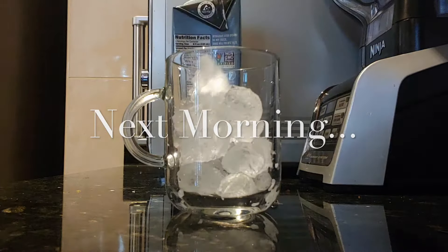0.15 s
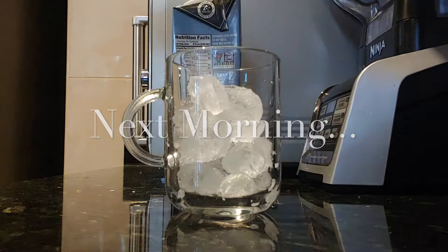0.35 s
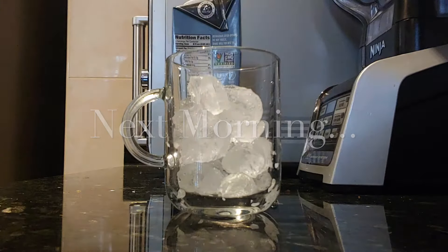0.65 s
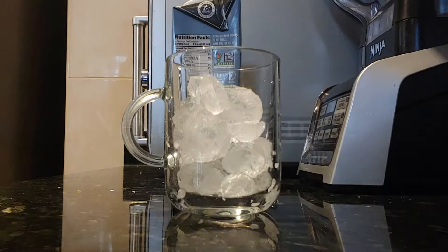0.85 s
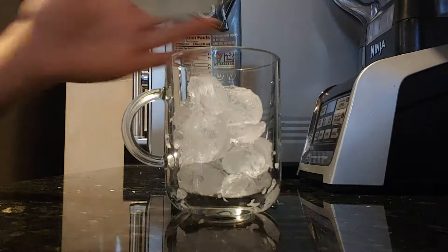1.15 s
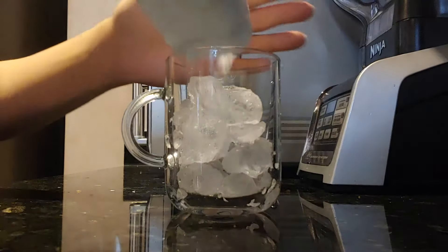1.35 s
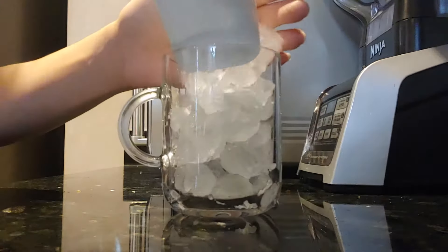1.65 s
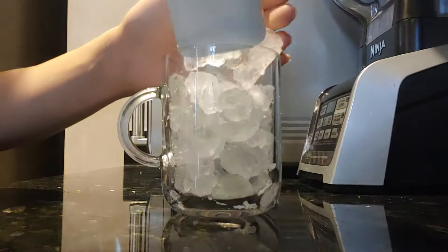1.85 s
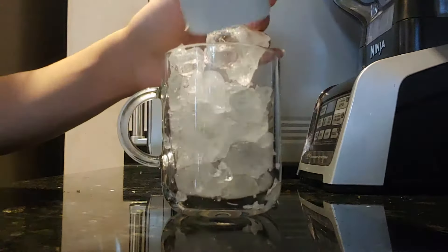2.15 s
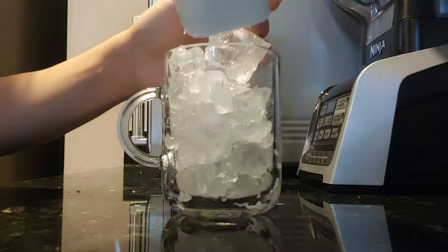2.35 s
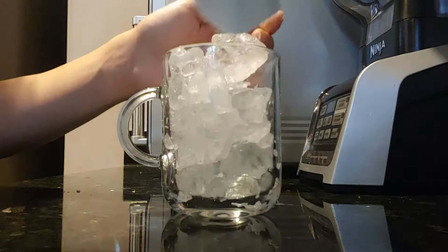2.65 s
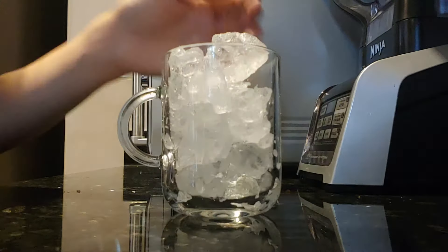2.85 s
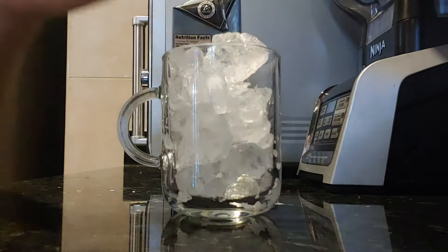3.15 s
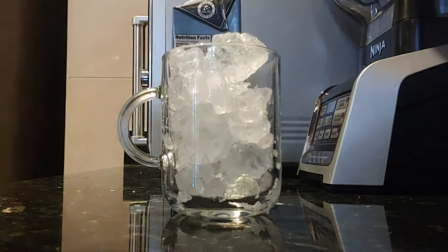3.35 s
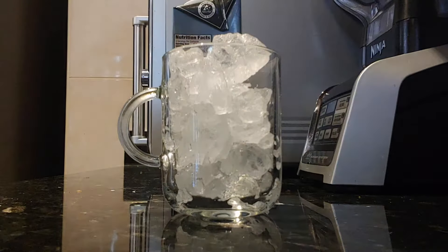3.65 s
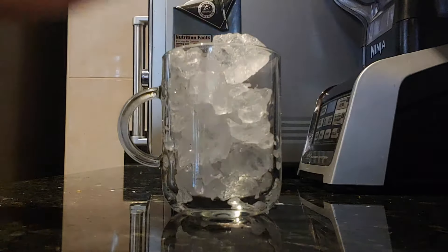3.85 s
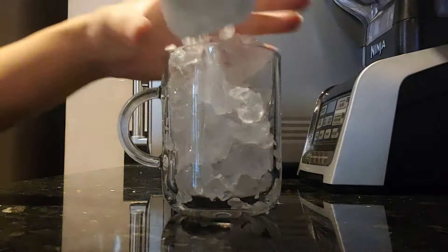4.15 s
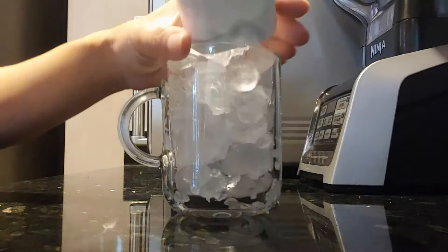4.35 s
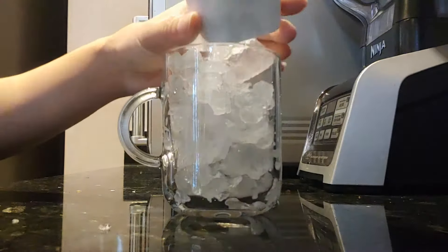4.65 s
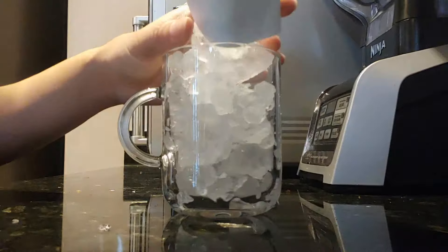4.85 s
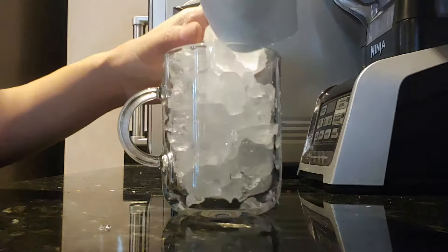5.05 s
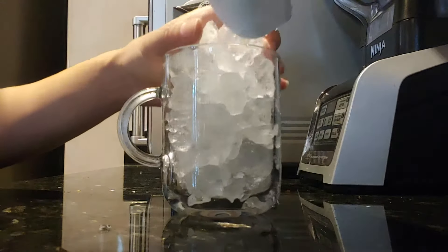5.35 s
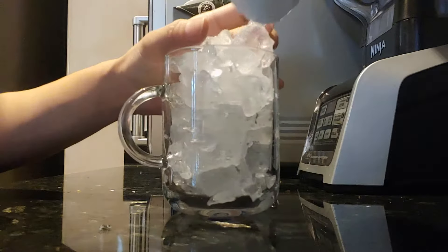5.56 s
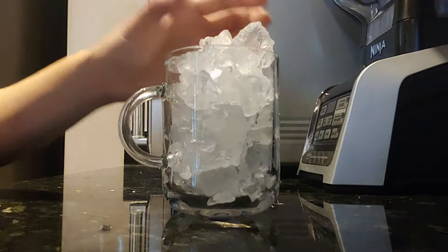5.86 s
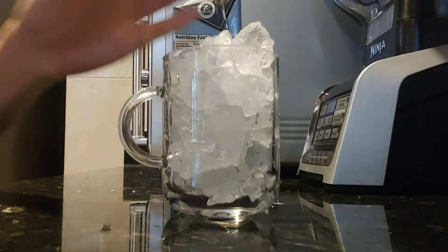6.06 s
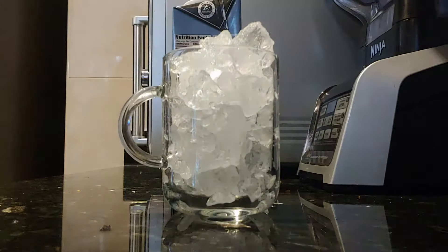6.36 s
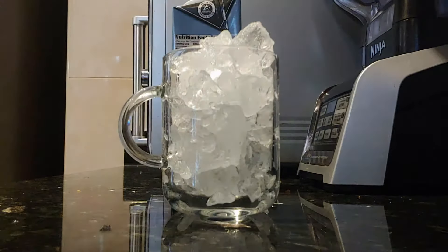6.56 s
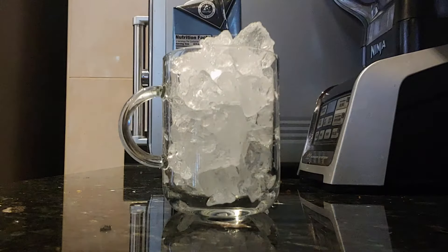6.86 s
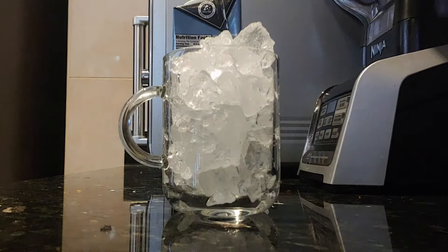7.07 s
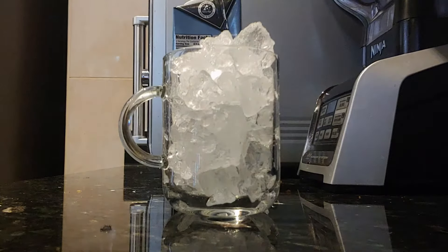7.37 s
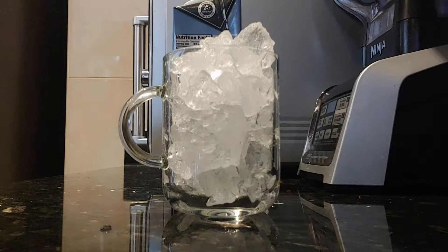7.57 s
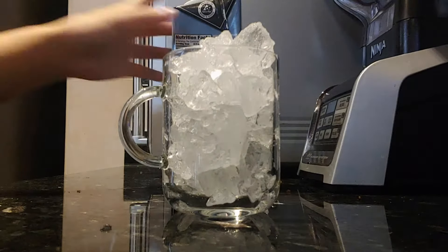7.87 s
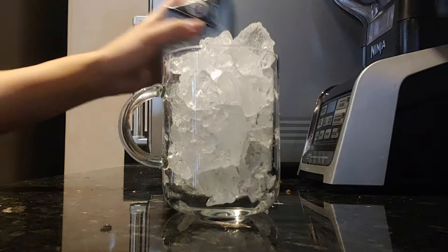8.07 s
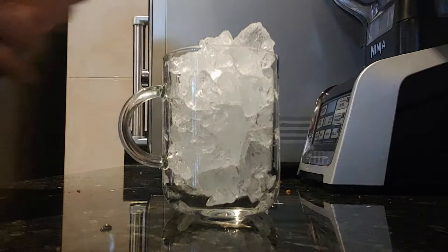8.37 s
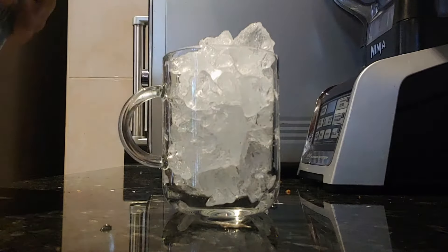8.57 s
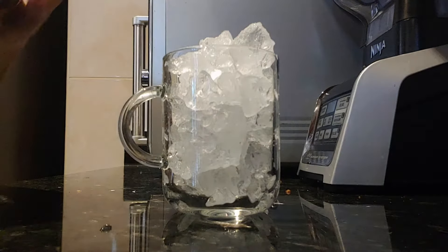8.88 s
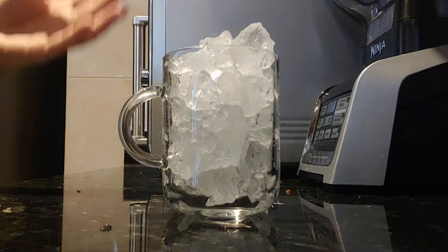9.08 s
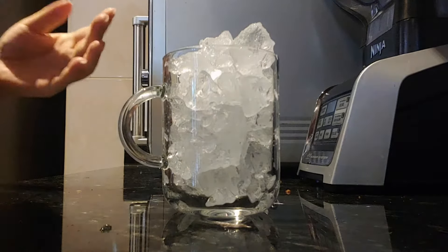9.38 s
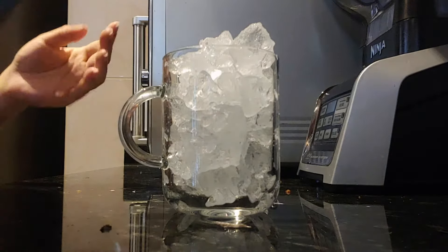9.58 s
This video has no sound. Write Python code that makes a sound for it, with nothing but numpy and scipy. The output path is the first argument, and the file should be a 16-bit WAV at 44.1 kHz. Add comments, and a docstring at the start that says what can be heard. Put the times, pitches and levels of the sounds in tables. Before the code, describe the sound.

A steady low fan rush with faint motor hum fills a small, hard kitchen throughout. At 0-0.4 s a cup hisses and drags through loose ice while a few cubes clink in a glass mug. A sharp distant clack comes at 0.6, then a flurry of hollow plastic knocks with counter thuds around 0.9. From 1.4 to 2.1 s ice pours in, bright, dense clinks over fine ticking, thinning to a strong single clink at 2.7. The plastic tub knocks at 3.0 and harder at 3.5. A second pour, 4.0-5.5 s, rattles lower and duller in the fuller mug. Two plastic knocks at 6.5 lead into crinkling film, snaps and rumble until about 7.2. Quiet taps follow; around 8.0-8.9 something is moved with soft bumps and light knocks. From 9.1 to the end, a bag of ice is shaken in loud, crunchy, rumbling jolts.

```python
"""A cup hisses and drags through loose ice while an appliance hums: shaped crackle over noise and motor tones.
Ice is tipped twice into a glass mug: damped modal clinks over finer ticks. Before, between and after,
a plastic tub is knocked (lower modes), with noise thuds through the stone counter and far clacks.
Small things are tapped; late on, a bag of ice is rummaged and shaken and a carton moved: crinkle, snaps, rumble.
Noise-built reflections and tail make the small, hard kitchen; two microphone ports colour the result."""
import sys
import numpy as np
from scipy import signal
from scipy.fft import rfft, irfft
from scipy.io import wavfile

SR = 44100
rng = np.random.default_rng(int(sys.argv[2]) if len(sys.argv) > 2 else 0)


def wav_out(sig):
    """Save sig, one row per channel (or a flat mono array), as 16-bit PCM at SR to the path in sys.argv[1]."""
    wavfile.write(sys.argv[1], SR, np.round(np.clip(np.atleast_2d(sig).T, -1, 1) * 32767).astype(np.int16))


N = 428652

# strokes of the cup through loose ice: (start [s], length [s], hiss [dB], drag [dB])
CUP_STROKES = [(0, 0.052, -35, -55), (0.13, 0.048, -41, -36.5), (0.24, 0.13, -39.5, -48.5),
               (0.41, 0.015, -29.5, -49)]
# loud cubes striking the mug: (time [s], level [dB], favoured ring [Hz], treble cue [dB])
MUG_CLINKS = [(0.001, -15, 2290, -15), (0.227, -11.5, 2120, -28), (0.299, -20.5, 2070, -3),
              (1.399, -1.5, 1570, 4.5), (1.461, -11.5, 2150, 0), (1.509, -8.5, 2090, -5),
              (1.587, -2.5, 1560, -15), (1.599, -2, 2050, 2), (1.612, -0.5, 2100, -1),
              (1.624, -4, 2090, -10), (1.648, -3.5, 1410, -19), (1.693, -6, 2160, -14),
              (1.715, -8.5, 1910, -1), (1.763, -18.5, 2010, -17), (1.938, -14.5, 2150, -4),
              (2.044, -5.5, 2140, -19), (2.247, -21, 1940, -15), (2.365, -21, 2200, -31),
              (2.596, -24.5, 1780, -23), (2.644, -27, 1010, -40), (2.728, 0.5, 1613, -18.5),
              (2.781, -16, 1580, -3), (4.007, -9.5, 2144, -10.5), (4.081, -18, 2184, -0.5),
              (4.206, -5.5, 2160, -5), (4.249, -4, 1600, -15), (4.266, -5.5, 1494, -26),
              (4.311, -9.5, 1490, -23), (4.339, -11.5, 1530, -14), (4.372, -12, 1514, -40),
              (4.462, -16, 1440, -42), (4.599, -15, 1395, -38), (4.654, -17, 1400, -42),
              (4.805, -7.5, 1620, -16), (4.885, -10, 1556, -20), (4.934, -11, 1570, -33),
              (4.955, -13, 1690, -23), (4.975, -8, 1445, -39), (5.144, -11.5, 1472, -25),
              (5.184, -17.5, 1530, -16), (5.251, -1.5, 1550, -22.5), (5.27, -10.5, 1640, -21),
              (5.358, -14.5, 1610, -15), (5.37, -13.5, 1470, -44), (5.528, -9, 2100, -20)]
# dull bumps carried by the counter: (time [s], level [dB])
COUNTER_THUDS = [(0.56, -40), (0.588, -41), (0.882, -26.5), (0.897, -24), (2.728, -31.5), (2.966, -37),
                 (3.483, -24.5), (3.52, -16.5), (6.819, -19.5), (7.028, -22.5), (8.354, -25),
                 (8.496, -27.5), (8.518, -26), (8.81, -34)]
# hard clacks across the kitchen: (time [s], level [dB])
FAR_CLACKS = [(0.614, -28), (0.641, -10), (3.355, -37.5)]
# blows on the plastic tub: (time [s], level [dB], favoured ring [Hz], treble cue [dB])
TUB_KNOCKS = [(0.871, -16, 1473, -11), (0.884, -14, 1460, -13), (0.917, -14.5, 1555, -15),
              (0.951, -13, 1520, -11), (0.964, -15, 1600, -41), (2.968, -9, 700, -41),
              (2.983, -9.5, 1740, -17), (2.996, -13, 1190, -9), (3.483, -2, 1485, -18),
              (3.498, -3, 1410, -13), (3.516, -6.5, 1630, -13), (3.523, -0.5, 1007, -11),
              (3.538, -13, 1520, 0), (6.472, -8.5, 1550, -17), (6.488, -2.5, 1430, -2),
              (8.034, -20, 993, -14)]
# batches of cubes sliding into the mug: (start [s], length [s], level [dB])
ICE_SLIDES = [(1.4, .37, -31.5), (1.54, 0.11, -27.5), (1.77, 0.12, -43.5), (1.96, .12, -35.5),
              (2.55, 0.054, -45.5), (2.755, 0.037, -36.5), (3.98, 0.048, -35), (4.04, .16, -42),
              (4.21, 0.069, -28.5), (4.29, 0.13, -35), (4.42, 0.29, -44), (4.83, 0.15, -35.5),
              (5.02, 0.34, -41.5), (5.5, 0.042, -40.5)]
# light taps of things being handled: (time [s], level [dB], favoured ring [Hz], treble cue [dB])
LIGHT_TAPS = [(3.6228, -30, 6820, -4), (3.7742, -35.5, 6940, -6), (6.4028, -31.5, 1480, 6),
              (7.5054, -28.5, 1800, -6), (7.5936, -33, 2330, -12), (8.2707, -29.5, 6860, -5),
              (8.4931, -21, 2160, -24), (8.5525, -20, 2220, -29), (8.6036, -30, 2190, -6),
              (8.7146, -23, 2580, -6), (8.8738, -19.5, 2070, -15.5), (9.1142, -19, 7100, -1),
              (9.1232, -18, 7160, 0), (9.1354, -15, 6850, -18)]
# rustles of bag and carton being handled: (start [s], length [s], crinkle [dB], rumble [dB])
BAG_RUSTLES = [(6.52, 0.06, -26.5, -33), (6.7, 0.11, -25, -31), (6.87, .26, -29.5, -31.5),
               (7.2, 0.39, -47.5, -47), (8.01, 0.045, -37, -42.5), (8.15, 0.65, -49.5, -50.5),
               (8.37, .02, -40.5, -48), (8.51, 0.034, -43, -48), (8.78, 0.053, -41, -39.5),
               (9.14, 0.55, -35, -35.5), (9.39, 0.024, -34.5, -34.5)]
# jolts of the bag, its ice shifting: (time [s], level [dB], thump re level [dB], film snap re level [dB])
BAG_JOLTS = [(6.739, -18, -9, -1.5), (6.817, -27.5, -10, 9), (6.947, -29, -12, 10.5),
             (7.024, -15.5, -8.5, -8), (9.132, -5.5, -13, -6.5), (9.259, -8.5, -18.5, -37),
             (9.356, -5, -15.5, -39), (9.496, -5, -23, -40), (9.596, -6.5, -13, -35)]

# modes of the ice-filled mug: (nominal frequency [Hz], level [dB], t60 [s])
MUG_MODES = [(650, -2, 0.054), (870, -17, 0.024), (1240, 4, 0.024), (1410, -5.5, 0.043), (1523, -2, 0.042),
             (2100, 4, 0.024), (2209, 4, 0.018), (2640, -7.5, 0.028), (3420, 3, 0.013), (3960, -3, 0.026),
             (4164, -3.5, 0.027), (4966, -3, 0.051), (5160, -5.5, 0.03), (5850, -22, 0.024),
             (6880, -24, 0.089), (9300, 0, 0.041), (12200, -26, .02), (14200, -24, .01)]
# modes of the plastic tub: (nominal frequency [Hz], level [dB], t60 [s])
TUB_MODES = [(166.4, -1.5, 0.1), (276.7, -5, 0.13), (486, 2.5, 0.079), (728, 2.5, 0.034), (1008, 16, 0.032),
             (1400, -0.5, 0.064), (1490, 2.5, 0.062), (1860, -5, 0.019), (2280, -1, 0.044),
             (3140, -10, 0.022), (4200, -27, 0.024), (7150, -13.5, 0.1)]
# modes of small hard things: (nominal frequency [Hz], level [dB], t60 [s])
TRINKET_MODES = [(520, -7, 0.083), (1040, 14, 0.014), (2210, 4, 0.012), (2710, -1, 0.023), (3140, 2, 0.019),
                 (4430, -10, 0.04), (7220, -16, 0.019)]

# contact noise of a blow: (frequency [Hz], level [dB])
CRACK_SPECTRUM = [(100, 1), (400, 0.5), (900, 13), (1600, 14.5), (3500, 1), (7000, -2), (15000, 4)]
# ice hissing along the cup: (frequency [Hz], level [dB])
SCRAPE_SPECTRUM = [(150, -25), (900, -18), (2200, -2), (4000, -6), (7000, -2), (11000, 2.5), (15000, 3)]
# drone of the cup pushed into ice: (frequency [Hz], level [dB])
DRAG_SPECTRUM = [(300, -34), (950, 3), (1300, -1), (2200, 2.5), (4000, -5.5), (8000, -11.5)]
# thuds and bag rumble: (frequency [Hz], level [dB])
RUMBLE_SPECTRUM = [(40, -11), (100, -3.5), (170, -1.5), (235, -6.5), (300, 1.5), (380, 0), (520, -5),
                   (800, -10.5), (1500, -15), (5000, -66)]
# far clacks: (frequency [Hz], level [dB])
CLACK_SPECTRUM = [(150, -33), (600, -12), (1300, 0), (2000, 2), (3200, 3.5), (5500, 1), (6500, 8.5),
                  (7400, 4), (10000, 5.5), (11500, 7.5), (15000, 11)]
# crinkling film: (frequency [Hz], level [dB])
CRINKLE_SPECTRUM = [(200, -31), (600, 4), (1000, 4), (1900, 2.5), (3000, -3), (5000, -6), (7000, -7.5),
                    (11000, -4.5), (15000, -2)]
# snapping film: (frequency [Hz], level [dB])
FILM_SPECTRUM = [(1500, -21), (4000, -8), (7000, 0), (11500, 4), (15000, -9)]
# fan rush: (frequency [Hz], level [dB])
AIR_SPECTRUM = [(25, 6), (55, -7), (90, 1), (170, -4), (260, -8.5), (400, -8), (550, -14), (800, -22.5),
                (1000, -22.5), (1300, -32), (2200, -34.5), (4000, -37), (7000, -35.5), (15000, -31.5)]
# motor tones: (frequency [Hz], rms level [dB])
MOTOR_TONES = [(53.8, -54.5), (178, -61), (361, -65.5), (425, -64.5)]
# decay of the room's tail by band: (from [Hz], to [Hz], t60 [s])
ROOM_BANDS = [(101, 1700, 0.089), (477, 2000, 0.17), (2160, 20800, 0.41), (8600, 16000, 0.083)]
# resonances of the left microphone port: (frequency [Hz], gain [dB])
LEFT_PORT_GAIN = [(100, 2.5), (700, 5), (1400, -0.5), (2000, -4.5), (2700, 2), (3800, 6), (5200, 7),
                  (7200, -2.5), (8500, -18.5), (9800, -5.5), (10600, -10.5), (11800, -2), (13000, -17.5),
                  (14300, -16.5)]
# resonances of the right microphone port: (frequency [Hz], gain [dB])
RIGHT_PORT_GAIN = [(100, 0.5), (700, 4), (1200, 1), (1600, 6), (2100, 10), (3000, 8), (4000, 7.5),
                   (5900, 0), (6950, 13.5), (7700, 4.5), (8500, -15.5), (11000, -17.5), (15000, -23)]

# builds rise by 60 dB, t60s fall by 60 dB
STROKE_BUILD_S, STROKE_T60_S = 0.24, 0.25
SLIDE_BUILD_S, SLIDE_T60_S = 0.18, 0.13
RUSTLE_BUILD_S, RUSTLE_T60_S = 0.2, 0.4
JOLT_ATTACK_S, JOLT_T60_S = 0.021, 0.16
CLINK_PAN_DB, CLINK_SCATTER_DB = 0.8, 2  # left minus right; cubes land round the wall
AIR_RMS_DB = -48
TOP_HZ = 15900
TIME_S = np.arange(N) / SR
RING_TIME_S = TIME_S[:SR // 8]
ROOM_TIME_S = TIME_S[:SR // 2]


def undb(db):
    """Decibels to gain."""
    return 10 ** (np.asarray(db) / 20)


def unit(x):
    """Scale to rms 1."""
    return x / np.sqrt(np.mean(x ** 2))


def fade(t_s, t60_s):
    """Free decay, 60 dB down after t60."""
    return np.exp(-np.log(1000) * t_s / max(t60_s, 1e-3))


def convolve(x, response):
    """Pass sound through a response, keeping its length."""
    return signal.fftconvolve(np.atleast_2d(x), np.atleast_2d(response), axes=-1)[:, :x.shape[-1]]


def colour(x, points, size=4096):
    """Minimum-phase filter through (Hz, dB) points, by folding the cepstrum."""
    hz, db = np.transpose(points)
    grid_hz = np.maximum(np.arange(size // 2 + 1) * SR / size, 1)
    grid_db = np.interp(np.log(grid_hz), np.log(hz), db)
    cepstrum = irfft(np.log(undb(grid_db)))
    cepstrum[1:size // 2] *= 2
    cepstrum[size // 2 + 1:] = 0
    return convolve(x, irfft(np.exp(rfft(cepstrum))))


def add(out, start_s, sound):
    """Mix a sound in at a time."""
    start = max(int(start_s * SR), 0)
    out[:, start:start + sound.shape[1]] += sound[:, :N - start]


def sides(pan_db):
    """Left and right gains for a level difference."""
    return undb(np.array([[1], [-1]]) * pan_db / 2)


def from_left(x, delay_samples=9):
    """Sound from the left reaches the right port a few samples late."""
    return np.vstack([x[0], np.pad(x[1], (delay_samples, 0))[:N]])


def gestures(table, build_s, t60_s, axis=2):
    """Gain over time of movements that build up, hold for their length and die away."""
    power = 0
    for row in table:
        t_s = TIME_S - row[0]
        build = fade(np.clip(-t_s, 0, 1), build_s)
        release = fade(np.clip(t_s - row[1], 0, 1), t60_s)
        power = power + (undb(row[axis]) * build * release) ** 2
    return np.sqrt(power)


def grains(rate_hz, spread_db):
    """Random tiny impacts, most weak and a few strong."""
    size = undb(spread_db * np.minimum(rng.exponential(size=N), 3.5))
    return (rng.random(N) < rate_hz / SR) * size * rng.choice([-1, 1], N)


def crackle(rate_hz, spread_db, t60_s, shared):
    """Dense tiny snaps, each a brief noise burst that the two ports partly share."""
    power = convolve(grains(rate_hz, spread_db) ** 2, fade(RING_TIME_S, t60_s) ** 2)
    noise = rng.standard_normal((3, N))
    return np.sqrt(abs(power)) * (noise[:2] + shared * noise[2])


def chinks(rate_hz, centre_hz, spread, t60_s, spread_db, size=600):
    """Single cubes tick, each briefly at its own pitch and from its own place."""
    count = int(rate_hz * N / SR)
    when, strength, turn, side = rng.random((count, 4)).T[:, :, None]
    hz = np.clip(centre_hz * np.exp(spread * rng.standard_normal((count, 1))), 300, SR / 3)
    t_s = TIME_S[:size]
    strength_gain = undb(-spread_db * np.log(np.maximum(strength, 0.04)))
    envelope = strength_gain * fade(t_s, t60_s) * (1 - fade(t_s, 0.002))
    index = ((when * (N - size)).astype(int) + np.arange(size)).ravel()
    phase = 2 * np.pi * (hz * t_s + turn)
    channels = []
    for lag in (-1, 1):
        ticks = envelope * np.sin(phase + lag * (side - 0.5))
        channels.append(np.bincount(index, ticks.ravel(), N))
    return np.array(channels)


def strike(modes, ring_hz, treble_db, focus_db, crack_db, crack_t60_s, skew_rad):
    """One blow: contact favours modes near ring_hz, tunes the nearest to it; hard contact adds treble."""
    hz, db, t60_s = np.transpose(modes)
    chance = rng.standard_normal((4, len(hz)))
    hardness_db = 0.5 * np.clip(treble_db + 20.5, -16, 16)
    favour_db = focus_db * np.exp(-(np.log(hz / ring_hz) / 0.12) ** 2)
    db = db + favour_db + hardness_db * (hz > 2900) + 2 * chance[0]
    nearest = np.arange(len(hz)) == np.argmin(abs(hz - ring_hz))
    hz = hz * (1 + 0.038 * np.minimum(1, 1700 / hz) ** 1.14 * chance[1])  # low modes stray most
    hz = np.where(nearest, ring_hz, hz)
    phase = skew_rad * (chance[2:] - chance[2:].mean(0))  # modes radiate differently to the ports
    turns = hz[:, None] * RING_TIME_S + rng.random((len(hz), 1))
    waves = np.sin(2 * np.pi * turns + phase[:, :, None])
    ring = (waves * undb(db[:, None] - 60 * RING_TIME_S / t60_s[:, None])).sum(1)

    noise = rng.standard_normal((3, len(RING_TIME_S)))
    crack_tone = [(f, level + hardness_db * (f > 2500)) for f, level in CRACK_SPECTRUM]
    crack = colour((noise[:2] + 1.22 * noise[2]) * fade(RING_TIME_S, crack_t60_s), crack_tone)
    crack_gain = undb(crack_db + 1.1 * hardness_db)
    contact = 1 - fade(RING_TIME_S, 0.0012)  # the edge crushes before full force
    return undb(-23) * unit(contact * (unit(ring) + crack_gain * unit(crack)))


def blows(table, modes, **contact):
    """Play a table of blows on one object."""
    out = np.zeros((2, N))
    for s, db, hz, treble_db in table:
        add(out, s, undb(db) * strike(modes, hz, treble_db, **contact))
    return out


def appliance():
    """Steady fan rush and a few gently wavering motor tones."""
    noise = rng.standard_normal((3, N))
    apart = colour(noise[:2], [(50, -14.5), (400, -3.5), (1500, 20.5), (5000, 4.5)])
    out = undb(AIR_RMS_DB) * unit(colour(apart + noise[2], AIR_SPECTRUM))
    knots_s = np.arange(0, N / SR + 1, 0.15)
    for hz, db in MOTOR_TONES:
        waver = np.interp(TIME_S, knots_s, rng.standard_normal(len(knots_s)))
        out = out + undb(db) * np.sqrt(2) * np.sin(2 * np.pi * hz * TIME_S + 0.68 * waver)
    return out


def scoop():
    """Loose ice hisses along the cup, which drones when it is pushed in harder."""
    hiss = colour(crackle(rate_hz=3600, spread_db=9.5, t60_s=0.045, shared=0.45), SCRAPE_SPECTRUM)
    drag = colour(crackle(rate_hz=1800, spread_db=1.5, t60_s=0.014, shared=1.0), DRAG_SPECTRUM)
    hiss_gain = gestures(CUP_STROKES, STROKE_BUILD_S, STROKE_T60_S)
    drag_gain = gestures(CUP_STROKES, STROKE_BUILD_S, STROKE_T60_S, axis=3)
    return undb(5.0) * (unit(hiss) * hiss_gain + unit(drag) * drag_gain)


def mug_modes(s):
    """The glass wall's 5 kHz ring is muffled as the ice rises to the rim."""
    open_db = np.interp(s, [0.3, 1.5, 2.7], [17, 7, -4])
    return [(hz, db + open_db * (4700 < hz < 5500), t60_s) for hz, db, t60_s in MUG_MODES]


def clinks():
    """Cubes hit the glass wall and each other: short modal rings with a crack of noise."""
    out = np.zeros((2, N))
    for s, db, hz, treble_db in MUG_CLINKS:
        sound = strike(mug_modes(s), hz, treble_db, focus_db=21, crack_db=-7.0,
                       crack_t60_s=0.057, skew_rad=0.35)
        pan_db = CLINK_PAN_DB + CLINK_SCATTER_DB * rng.standard_normal()
        add(out, s, undb(db) * sides(pan_db) * sound)
    return out


def thuds():
    """Soft, heavy contacts that rumble briefly."""
    out = np.zeros((2, N))
    envelope = (1 - fade(RING_TIME_S, 0.042)) * fade(RING_TIME_S, 0.058)
    for s, db in COUNTER_THUDS:
        noise = rng.standard_normal((3, len(RING_TIME_S)))
        add(out, s, undb(db) * (noise[:2] + 2 * noise[2]) * envelope)
    return colour(out, RUMBLE_SPECTRUM)


def far_clacks():
    """Sharp blows heard mostly by way of the walls: decaying noise, separate in each channel."""
    out = np.zeros((2, N))
    decay = fade(ROOM_TIME_S, 0.25) + undb(-43) * fade(ROOM_TIME_S, 0.28)
    for s, db in FAR_CLACKS:
        add(out, s, undb(db) * decay * rng.standard_normal((2, len(ROOM_TIME_S))))
    return colour(out, CLACK_SPECTRUM)


def tub_knocks():
    """Blows ring the plastic tub's modes."""
    return blows(TUB_KNOCKS, TUB_MODES, focus_db=20.0, crack_db=-6.0, crack_t60_s=0.097, skew_rad=0.38)


def tumbling_ice(count=10):
    """Cubes tick at several places on the glass and on each other; a fuller mug rings lower."""
    rattle = 0
    tilt_db = np.interp(TIME_S, [4.1, 4.5], [1, -10])  # per octave
    for hz in np.geomspace(1350, 2200, count):
        contact = strike(MUG_MODES, hz, treble_db=-14.0, focus_db=23, crack_db=-1.0,
                         crack_t60_s=0.039, skew_rad=1.0)
        hits = grains(rate_hz=40, spread_db=5.5) * undb(tilt_db * np.log2(hz / 1700))
        rattle = rattle + convolve(hits, contact)
    cubes = chinks(rate_hz=350, centre_hz=1500, spread=0.15, t60_s=0.011, spread_db=5.5)
    chips = chinks(rate_hz=620, centre_hz=3620, spread=0.3, t60_s=0.0067, spread_db=6.5)
    mix = undb(2.5) * unit(rattle) + undb(-1.5) * unit(cubes) + undb(-11.5) * unit(chips)
    return mix * gestures(ICE_SLIDES, SLIDE_BUILD_S, SLIDE_T60_S)


def light_taps():
    """Small hard things ring briefly when handled."""
    return blows(LIGHT_TAPS, TRINKET_MODES, focus_db=14, crack_db=-8.5, crack_t60_s=0.045, skew_rad=0.74)


def bag():
    """Film crinkles while the cubes inside tick and rumble.

    Every jolt swells these three; the earlier ones also snap the film, the later shakes hardly at all.
    """
    rustle = gestures(BAG_RUSTLES, RUSTLE_BUILD_S, RUSTLE_T60_S)
    rumble_gain = undb(-3.0) * gestures(BAG_RUSTLES, RUSTLE_BUILD_S, RUSTLE_T60_S, axis=3)
    jolt, snap_gain = 0, 0
    for s, db, thump_db, snap_db in BAG_JOLTS:
        t_s = np.maximum(TIME_S - s, 0)
        swell = undb(db) * (1 - fade(t_s, JOLT_ATTACK_S)) * fade(t_s, JOLT_T60_S)
        jolt = jolt + swell
        rumble_gain = rumble_gain + undb(-3 + thump_db) * swell
        snap_gain = snap_gain + undb(-4.0 + snap_db) * swell
    crinkle = colour(crackle(rate_hz=1300, spread_db=4.5, t60_s=0.021, shared=0.38), CRINKLE_SPECTRUM)
    cubes = chinks(rate_hz=650, centre_hz=1600, spread=0.288, t60_s=0.014, spread_db=4.5)
    snap = colour(crackle(rate_hz=1400, spread_db=9.0, t60_s=0.0071, shared=0.37), FILM_SPECTRUM)
    rumble = colour(crackle(rate_hz=330, spread_db=1.0, t60_s=0.055, shared=3.9), RUMBLE_SPECTRUM)
    crinkle_gain = undb(-1.5) * rustle + undb(-17.5) * jolt
    cubes_gain = undb(-14) * rustle + undb(-16) * jolt
    return (unit(crinkle) * crinkle_gain + unit(cubes) * cubes_gain
            + unit(snap) * snap_gain + unit(rumble) * rumble_gain)


def kitchen(x, early_db, tail_db):
    """Quick reflections from the splashback and appliances, then the room's tail."""
    t_s = ROOM_TIME_S
    noise = rng.standard_normal((2, len(t_s)))
    tail = 0
    for low_hz, high_hz, t60_s in ROOM_BANDS:
        band_hz = [low_hz, min(high_hz, SR * 0.45)]
        band = signal.butter(2, band_hz, "band", fs=SR, output="sos")
        tail = tail + signal.sosfilt(band, noise) * fade(t_s, t60_s)
    tail = tail * (1 - fade(t_s, 0.096))
    early = rng.standard_normal((2, len(t_s))) * (rng.random((2, len(t_s))) < 0.04)
    early = early * fade(t_s, 0.11) * (t_s > 0.0015)
    response = 0
    for part, db in [(early, early_db), (tail, tail_db)]:
        response = response + undb(db) * part / np.linalg.norm(part, axis=1, keepdims=True)
    return x + convolve(x, response)


def scene():
    """The mug stands close to the microphone; tub and bag are further off and wetter."""
    mug = undb(-1.0) * clinks() + undb(-0.5) * tumbling_ice()
    tub = tub_knocks() + undb(17.0) * thuds()
    handling = undb(4) * light_taps() + scoop() + undb(-4.0) * far_clacks() + bag()
    aside = from_left(handling) * sides(-0.45)
    near = kitchen(mug, early_db=-9.5, tail_db=-17.0)
    far = kitchen(tub + aside, early_db=-6.5, tail_db=-12.5)
    return near + far + appliance()


def record(dry):
    """Each port colours its channel; the loudest peaks are rounded and the top is cut."""
    ports = np.vstack([colour(dry[0], LEFT_PORT_GAIN), colour(dry[1], RIGHT_PORT_GAIN)])
    top_cut = signal.ellip(8, 0.2, 70, TOP_HZ, fs=SR, output="sos")
    return signal.sosfilt(top_cut, np.tanh(ports))


dry = scene()
out = record(dry)
wav_out(out)
```